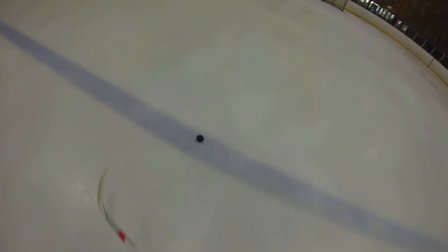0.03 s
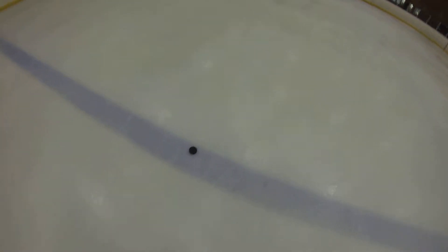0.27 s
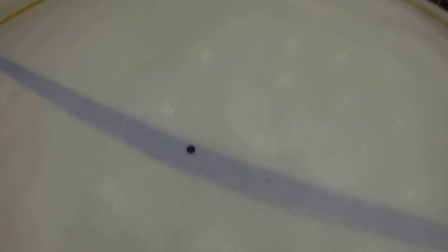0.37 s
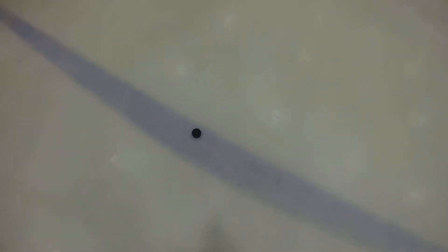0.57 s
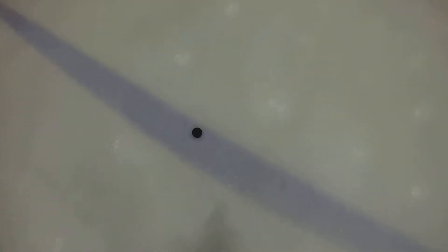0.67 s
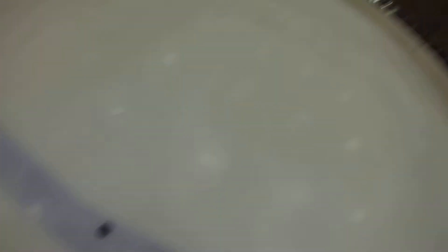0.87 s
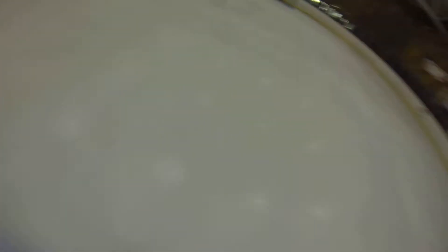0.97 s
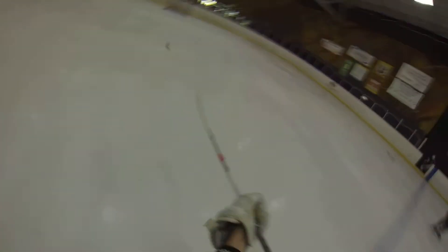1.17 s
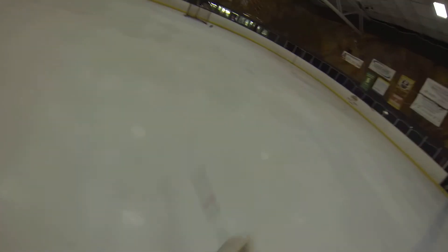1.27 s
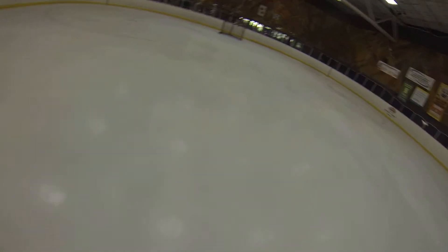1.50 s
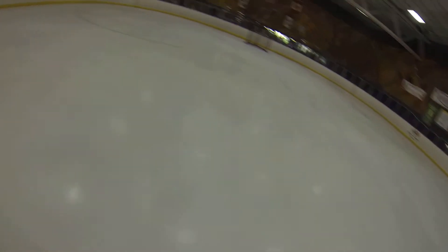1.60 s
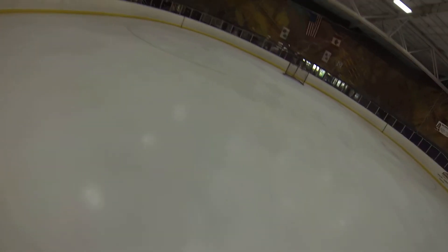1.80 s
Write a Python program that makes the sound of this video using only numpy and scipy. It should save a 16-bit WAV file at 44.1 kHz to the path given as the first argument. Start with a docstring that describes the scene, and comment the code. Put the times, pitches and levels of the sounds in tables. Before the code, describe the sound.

A hockey stick shot: the blade slaps the ice at about 0.91 seconds, then cracks hard and woody on the puck near 0.97, with a faint rink echo. Before it, low gliding, soft hiss and dull gear knocks, strongest around 0.57 to 0.65. Air rumble swells to a deep jolt at 1.05 with tiny scrapes; lighter knocks fade by 1.4, leaving hiss and low rumble, muffled by the camera case.

```python
"""A skater shoots a puck in an indoor rink, heard from a camera worn in a hard case.
First the skater glides up: filtered noise makes ice roll, scrapes, air rumble and the rink's hiss.
Knocks of skates and gear, decaying sines and noise bursts, begin here and go on past the shot.
The blade then slaps the ice and cracks against the puck, ringing damped modes with bright noise snaps.
Gain control ducks after the crack and recovers, while the follow-through jolts the case."""
import sys
import numpy as np
from scipy import signal
from scipy.fft import rfft, irfft, next_fast_len
from scipy.io import wavfile
from scipy.ndimage import uniform_filter1d, minimum_filter1d

SR = 44100
rng = np.random.default_rng(int(sys.argv[2]) if len(sys.argv) > 2 else 0)


def store_pcm(level_fs):
    """Save levels as 16-bit WAV."""
    pcm = np.round(np.clip(level_fs, -1, 1) * 32767).astype(np.int16)
    wavfile.write(sys.argv[1], SR, np.atleast_2d(pcm).T)


N = 81585


def amp(db):
    """Decibel definition: amplitude ratio is 10 to the power dB/20."""
    return 10 ** (np.asarray(db) / 20)


def unit(x):
    """Normalization: scale to a root-mean-square value of 1."""
    return x / np.sqrt(np.mean(x ** 2) + 1e-20)


def along(points, hz):
    """Logarithmic frequency scale: interpolate (frequency, value) points along log frequency."""
    f, values = np.transpose(points)
    return np.interp(np.log(hz + 1), np.log(f + 1), values)


def clock():
    """Sampling: the time in seconds of each sample."""
    return np.arange(N) / SR


def level(rows):
    """Amplitude envelope: a gain per sample, interpolated in dB from (time, level) rows."""
    return amp(np.interp(clock(), *np.transpose(rows)))


def filtered(x, response):
    """Linear filtering: multiply the spectrum by a response of frequency."""
    size = next_fast_len(N + SR // 2)
    hz = np.fft.rfftfreq(size, 1 / SR)
    return irfft(rfft(x, size) * response(hz), size)[:N]


def noise(colour):
    """Spectral shaping: white noise filtered to a colour, at rms 1."""
    white = rng.standard_normal(N)
    return unit(filtered(white, lambda hz: amp(along(colour, hz))))


def burst(start, attack, t60):
    """Damped decay: a quick rise, then an exponential fall of 60 dB per t60."""
    t = np.maximum(clock() - start, 0)
    return (1 - np.exp(-t / attack)) * amp(-60 * t / t60)


def tone(start, hz):
    """Simple harmonic motion: a sine with zero phase at the start time."""
    return np.sin(2 * np.pi * hz * (clock() - start))


# blade contacts on ice and puck: [t/s, level/dB, hardness f/Hz, snap level/dB, snap t60/s]
STRIKES = [(0.9086, -9.5, 2370, -52, 0.0087), (0.914, -16.5, 2170, -61.5, 0.0073),
           (.9627, -10, 2100, -79, .005), (.9700, -6, 2400, -17, 0.0081), (0.9817, 2, 7500, -13, 0.011),
           (0.9966, -12, 3000, -26, 0.018)]
# modes the blows ring with: [f/Hz, level/dB, t60/s]
RING = [(938, -38, 0.053), (1095, -20, 0.027), (1423, -7, 0.024), (1567, -2.5, 0.02), (1955, -13.5, 0.022),
        (2570, -23.5, 0.024), (3082, -25.5, 0.049), (3297, -12.5, 0.019), (3470, -34, 0.14),
        (3723, -18.5, 0.016), (4050, -25, 0.026), (6110, -23, .014), (6770, -20.5, .009)]
# spectrum of the bright snap and its tail: [f/Hz, level/dB]
SNAP_COLOUR = [(300, -17), (800, -35.5), (1050, 7), (1600, 5), (2600, -12), (3500, 2.5), (5000, -14.5),
               (6500, -12), (8500, -22.5), (12000, -32.5), (15000, -34.5)]
CONTACT_S, SNAP_LAG_S, SNAP_ATTACK_S = 0.0009, 0.001, 0.0002
TREBLE_TAIL_DB, TREBLE_TAIL_T60_S = -28.5, 0.3  # the room's weak, bright tail, relative to its snap


def shot():
    """Modal excitation: contacts ring damped modes, duller at low hardness, then snap as the blade bites."""
    out = np.zeros(N)
    for start, db, hard_hz, snap_db, snap_t60 in STRIKES:
        for hz, mode_db, t60 in RING:
            softening = np.hypot(1, (hz / hard_hz) ** 4)  # modes above the hardness frequency are weak
            gain = amp(db + mode_db) / softening
            out += gain * burst(start, CONTACT_S, t60) * tone(start, hz)
        bite = start + SNAP_LAG_S
        snap = burst(bite, SNAP_ATTACK_S, snap_t60)
        treble_tail = amp(TREBLE_TAIL_DB) * burst(bite, SNAP_ATTACK_S, TREBLE_TAIL_T60_S)
        out += amp(snap_db) * (snap + treble_tail) * noise(SNAP_COLOUR)
    return out


# knocks of skates and gear:
# [t/s, thud f/Hz, thud level/dB, rustle level/dB, clack level/dB, t60/s]
KNOCKS = [(0.117, 241, -32.5, -49, -64, 0.089), (0.127, 259, -59, -45.5, -30.5, 0.027),
          (0.196, 236, -38.5, -57.5, -66, 0.14), (0.249, 244, -38, -53, -64, 0.063),
          (.283, 232, -30, -31, -37, 0.12), (.296, 379, -37, -49, -46.5, 0.2),
          (.571, 270, -16, -41.5, -55, 0.043), (0.633, 379.3, -33, -39, -52, 0.071),
          (0.65, 229, -13, -34, -22.5, 0.042), (.657, 520, -29, -27, -29.5, .07),
          (.682, 331, -39.5, -30.5, -47, 0.088), (0.7465, 426, -39, -33, -30, 0.059),
          (0.783, 260, -26, -50.5, -35.5, .09), (0.812, 170, -32.5, -30.5, -28, 0.047),
          (.8803, 200, -44.5, -38, -29, 0.055), (.911, 328, -54, -28, -22, 0.059),
          (1.029, 171, -27, -37.5, -49, 0.21), (1.0788, 292, -34, -26, -20.5, 0.083),
          (1.123, 198, -28, -36.5, -33, 0.058), (1.159, 250, -53, -46, -29, 0.017),
          (1.219, 233, -34, -38, -34.5, .07), (1.31, 256, -33.5, -43, -50, 0.047),
          (1.394, 224, -33, -41, -48.5, 0.1)]
# spectrum of the padding's rustle: [f/Hz, level/dB]
RUSTLE_COLOUR = [(60, -30), (150, -14), (235, -5), (330, -4.5), (430, -13.5), (540, -7.5), (720, -37),
                 (1200, -27.5), (4000, -79.5)]
# spectrum of the clack through the case: [f/Hz, level/dB]
CLACK_COLOUR = [(200, 4.5), (700, -20), (900, -1.5), (1100, -9.5), (1350, 3), (1650, 5.5), (2100, -9.5),
                (2600, -18.5), (3200, -16), (4000, -46), (7000, -45.5), (15000, -66)]
THUD_ATTACK_S, KNOCK_ATTACK_S = 0.0022, 0.00055


def knocks():
    """Impulsive excitation: a hollow damped thud, a dull rustle of padding and a clack through the case."""
    out = np.zeros(N)
    for start, hz, thud_db, rustle_db, clack_db, t60 in KNOCKS:
        out += amp(thud_db) * burst(start, THUD_ATTACK_S, t60) * tone(start, hz)
        rustle = amp(rustle_db) * noise(RUSTLE_COLOUR)
        clack = amp(clack_db) * noise(CLACK_COLOUR)
        out += burst(start, KNOCK_ATTACK_S, t60) * (rustle + clack)
    return out


# decay of the hall: [f/Hz, t60/s]
RINK = [(200, 0.87), (1500, 1.8), (4000, 2.4), (10000, 0.41)]


def rink(x):
    """Reverberation: convolve with a noise tail of unit energy that decays at a rate set by frequency."""
    hz, t, spectrum = signal.stft(rng.standard_normal(SR), SR, nperseg=256)
    decay = amp(-60 * t / along(RINK, hz)[:, None])
    tail = signal.istft(spectrum * decay, SR, nperseg=256)[1]
    return signal.fftconvolve(x, tail / np.linalg.norm(tail))[:N]


# edges scraping the ice: [t/s, half length (standard deviation)/s, level/dB]
SCRAPES = [(0.293, 0.005, -67), (.37, 0.048, -63.5), (.55, 1, -67), (0.956, 0.032, -62),
           (1.022, 0.0045, -44.5), (1.037, 0.0029, -53), (1.0535, 0.0014, -40), (1.0635, 0.00039, -43),
           (1.127, 0.002, -47.5)]
# spectrum of the scrapes: [f/Hz, level/dB]
SCRAPE_COLOUR = [(800, -18.5), (2000, 7), (4200, 5), (5500, -0.5), (8000, -6), (11000, -11.5),
                 (15000, -26.5)]
# level of the skates rolling on the ice: [t/s, level/dB]
GLIDE = [(0, -56.5), (.45, -55.5), (.62, -47.5), (.7, -53.5), (.8, -46.5), (.95, -41), (1.05, -33.5),
         (1.15, -44.5), (1.28, -55.5), (1.85, -57.5)]
# spectrum of the roll: [f/Hz, level/dB]
GLIDE_COLOUR = [(80, -25), (160, 3.5), (250, 8), (400, -3.5), (560, -2), (720, -12.5), (950, -9),
                (1500, -11), (3000, -53), (8000, -55.5)]
SCRAPE_GRAIN_DB = 4  # rms level variation


def ice():
    """Friction noise: grainy scrapes in Gaussian strokes over the low roll of gliding skates."""
    strokes = np.zeros(N)
    for centre, half, db in SCRAPES:
        strokes += amp(db) * np.exp(-((clock() - centre) / half) ** 2 / 2)
    wander = unit(uniform_filter1d(rng.standard_normal(N), size=40))
    grain = amp(SCRAPE_GRAIN_DB * wander)
    scrapes = strokes * unit(grain * noise(SCRAPE_COLOUR))
    return scrapes + level(GLIDE) * noise(GLIDE_COLOUR)


GUST_SPAN_S = 0.09


def gusts(colour):
    """Envelope normalization: low noise divided by its running strength, so it stays even."""
    x = noise(colour)
    power = np.abs(uniform_filter1d(x ** 2, size=int(GUST_SPAN_S * SR)))
    strength = np.sqrt(power + 1e-6)
    return unit(x / uniform_filter1d(strength, size=int(GUST_SPAN_S * SR / 2)))


# level of the slow air pressure swings: [t/s, level/dB]
SWAY = [(0, -28.5), (.2, -23.5), (.32, -16), (.45, -21), (.6, -13.5), (.69, -23), (.77, -7), (.88, -11),
        (.98, -10.5), (1.05, -6), (1.15, -18), (1.26, -30), (1.34, -26), (1.5, -21.5), (1.66, -20.5),
        (1.85, -28.5)]
# spectrum of the swings: [f/Hz, level/dB]
SWAY_COLOUR = [(8, -2), (20, 4), (35, -4), (48, -12.5), (62, -34.5), (90, -55), (200, -105.5)]
# level of the air buffeting the case: [t/s, level/dB]
BUFFET = [(0, -45), (.2, -42.5), (.32, -28.5), (.42, -47), (.55, -31), (.62, -26), (.69, -34.5), (.77, -23),
          (.9, -18), (.97, -26.5), (1.04, -11.5), (1.14, -19), (1.2, -38), (1.27, -38), (1.34, -28),
          (1.42, -27), (1.54, -38.5), (1.67, -31), (1.85, -36)]
# spectrum of the buffeting: [f/Hz, level/dB]
BUFFET_COLOUR = [(20, -29), (45, 1), (70, 2), (82, -6), (100, -23), (118, -20), (140, -28.5), (300, -59.5),
                 (800, -110)]
JOLT_S, JOLT_WIDTH_S, JOLT_HZ, JOLT_DB = 1.052, 0.012, 66, -0.5  # the follow-through shakes the case


def rumble():
    """Flow noise: air sways and buffets on the moving case, with one Gaussian-windowed jolt."""
    t = clock() - JOLT_S
    jolt = np.exp(-(t / JOLT_WIDTH_S) ** 2) * np.cos(2 * np.pi * JOLT_HZ * t)
    sway = level(SWAY) * gusts(SWAY_COLOUR)
    buffet = level(BUFFET) * gusts(BUFFET_COLOUR)
    return sway + buffet + amp(JOLT_DB) * jolt


# level of the rink's hiss: [t/s, level/dB]
HISS = [(0, -44), (.25, -41), (.6, -42.5), (.78, -40), (.92, -43.5), (1.02, -36), (1.11, -49), (1.2, -39.5),
        (1.3, -36.5), (1.55, -39.5), (1.85, -38.5)]
# spectrum facing the ice: [f/Hz, level/dB]
HISS_DOWN = [(130, -16), (250, -19.5), (420, -23.5), (750, -17.5), (1050, -18.5), (1300, 1.5), (1550, 1.5),
             (1900, -9.5), (2150, -7.5), (2700, -19), (3250, -13.5), (3700, -26), (4500, -29.5),
             (6500, -41.5), (9000, -46.5), (15000, -69.5)]
# spectrum facing down the rink: [f/Hz, level/dB]
HISS_UP = [(130, -26), (250, -21.5), (420, -25), (750, -13.5), (1050, -19), (1300, -2.5), (1550, 2.5),
           (1750, -2.5), (2100, -10.5), (2700, -15.5), (3250, -13), (3700, -22.5), (4500, -29.5),
           (5300, -33.5), (7000, -49.5), (10000, -62), (15000, -82)]
# the camera swings up between these times: [start t/s, end t/s]
TURN_S = [0.93, 1.1]
HISS_FLUTTER_DB = 1.07  # rms level variation


def hiss():
    """Equal-power crossfade: slightly fluttering noise changes colour as the camera swings up."""
    turn = np.interp(clock(), TURN_S, [0, np.pi / 2])
    wander = unit(uniform_filter1d(rng.standard_normal(N), size=300))
    flutter = amp(HISS_FLUTTER_DB * wander)
    colour_mix = np.cos(turn) * noise(HISS_DOWN) + np.sin(turn) * noise(HISS_UP)
    return level(HISS) * flutter * colour_mix


RINK_DB = -32.5


def scene():
    """Superposition: blows and their reverberation add to ice noise, hiss and rumble."""
    blows = shot() + knocks()
    hall = amp(RINK_DB) * rink(blows)
    return (blows + hall + ice() + hiss() + rumble())[None]


CEILING, LIMIT_WINDOW_S = 0.97, 0.012


def limiter(x):
    """Peak limiting: a smoothed gain looks ahead and eases peaks under the ceiling."""
    size = int(LIMIT_WINDOW_S * SR)
    gain = minimum_filter1d(CEILING / np.maximum(np.abs(x), CEILING), size=2 * size)
    smooth = uniform_filter1d(uniform_filter1d(gain, size=size), size=size)
    return x * smooth


DUCK_OVER_DB, DUCK_SHARE = -23, 0.81  # threshold, and the share of the excess dB to cut
DUCK_HOLD_S, RECOVER_DB_PER_S = 0.058, 83
DUCK_SMOOTH_S = 0.13  # time constant that eases the cut both in and out
SENSE_HZ, TOP_HZ = 500, 15760


def record(dry):
    """Dynamic compression: loud sound above 500 Hz ducks the gain; a limiter and band limit follow."""
    x, t = dry[0], clock()
    sensed = filtered(x, lambda hz: hz > SENSE_HZ)
    power = np.abs(uniform_filter1d(sensed ** 2, size=256))
    power_db = 10 * np.log10(power + 1e-12)
    need = DUCK_SHARE * np.maximum(power_db - DUCK_OVER_DB, 0)
    # hold: the greatest need over the samples just past
    hold = 2 * int(DUCK_HOLD_S * SR / 2) + 1
    held = -minimum_filter1d(-need, hold, origin=hold // 2, mode="constant")
    # recovery: the cut falls no faster than a straight slope in dB
    slope = RECOVER_DB_PER_S * t
    cut_db = np.maximum.accumulate(held + slope) - slope
    pole = np.exp(-1 / (DUCK_SMOOTH_S * SR))
    eased_db = signal.lfilter([1 - pole], [1, -pole], cut_db)
    ducked = x * amp(-eased_db)
    return filtered(limiter(ducked), lambda hz: hz < TOP_HZ)[None]


dry = scene()
out = record(dry)
store_pcm(out)
```